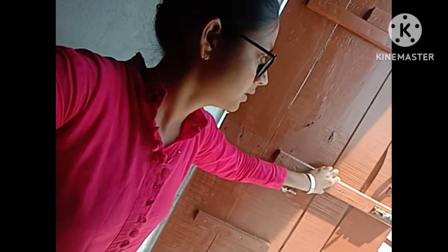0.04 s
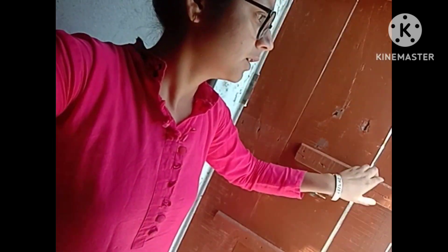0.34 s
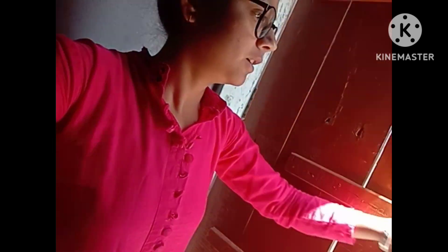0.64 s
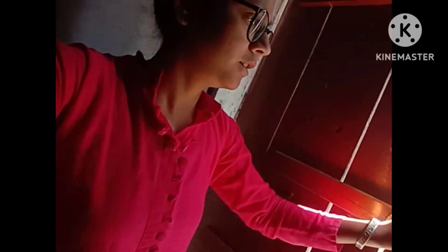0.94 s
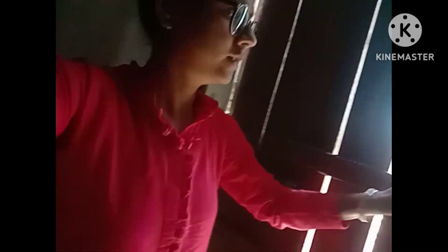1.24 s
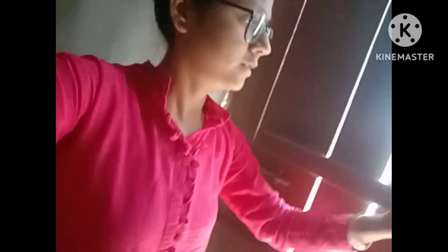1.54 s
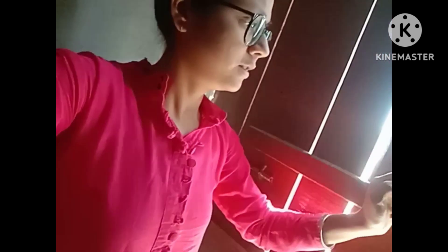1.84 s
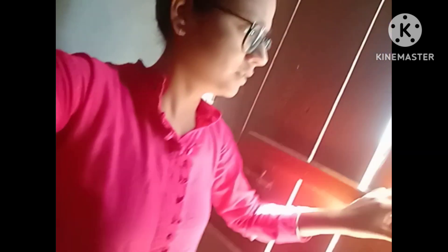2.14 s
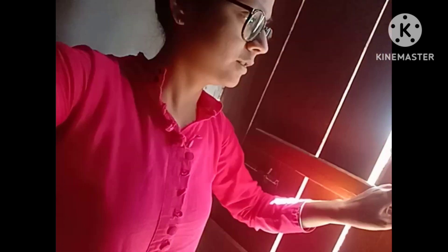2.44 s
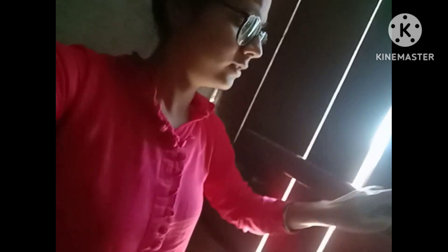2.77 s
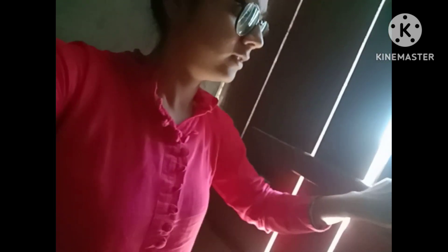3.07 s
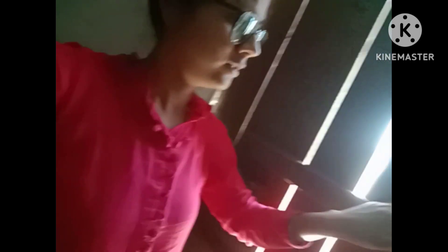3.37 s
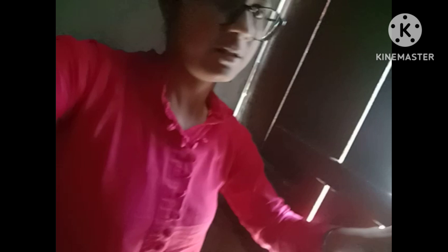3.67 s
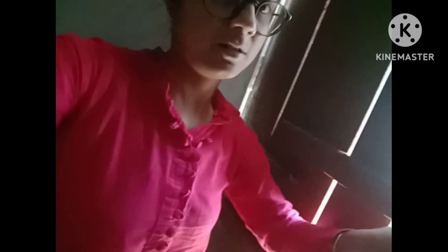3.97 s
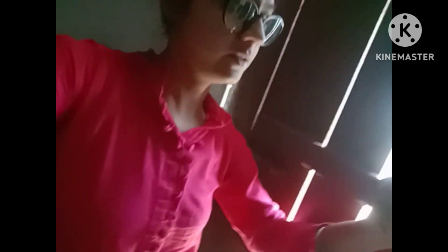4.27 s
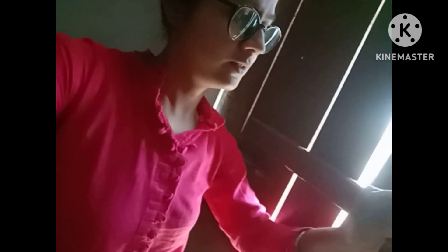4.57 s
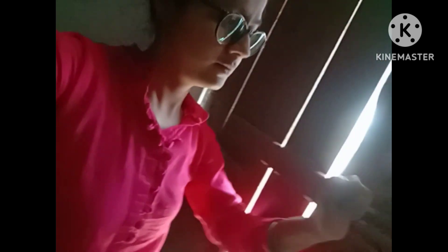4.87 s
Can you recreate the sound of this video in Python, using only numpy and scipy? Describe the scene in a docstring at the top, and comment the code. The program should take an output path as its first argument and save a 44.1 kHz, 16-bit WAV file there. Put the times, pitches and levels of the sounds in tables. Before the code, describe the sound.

A hand works a steel sliding bolt on a wooden plank door, close to the microphone in a small bare room. The bolt scrapes and clacks several times, then shoots home with a short metallic ring. The door thuds into its frame with a hollow boom. After faint ticks and hand brushing come a loud cluster of clacks and a second thud. A low rumble continues underneath.

```python
"""A steel sliding bolt is worked by hand on a wooden plank door, close up in a small bare room.
It scrapes in its guides, clacks against its stops and shoots home, setting its loop ringing.
Twice the door thuds into its frame and the leaf booms. Small ticks, thin squeaks and the brush
of a hand on wood fill the gaps. Underneath sits a bed of low room resonances, passing low tones,
restless air and a faint whine."""
import sys
import numpy as np
from scipy import signal
from scipy.fft import rfft, irfft, next_fast_len
from scipy.io import wavfile
from scipy.ndimage import uniform_filter1d, map_coordinates

SR = 44100
rng = np.random.default_rng(int(sys.argv[2]) if len(sys.argv) > 2 else 0)


def master_out(mix):
    """Clip the mix to full scale and print it as 16-bit PCM to the path in sys.argv[1]."""
    frames = np.transpose(np.atleast_2d(mix))
    ceiling = np.clip(frames, -1, 1)
    pcm = np.round(ceiling * 32767).astype(np.int16)
    wavfile.write(sys.argv[1], SR, pcm)


N = 225294

# bolt hits: t/s, level/dB before gain, struck spot f/Hz, wood/dB, brightness/dB, snap/dB
CLACKS = [(0.7408, -28, 1680, -29, -20.5, -13), (0.745, -24.5, 990, -18, -20.5, -2.5),
          (0.759, -32.5, 1000, -1, -9, -2.5), (1.16, -28.5, 4230, -38, -6.5, -5),
          (1.492, -20.5, 1350, -23, -30, -5), (1.505, -22.5, 1280, -16.5, -35.5, -4),
          (1.547, -25, 735, -7.5, -9, -10), (1.859, -39, 1400, -30, -10.5, -5.5),
          (2.392, -21.5, 1302, -4, -34, -16), (2.417, -14, 1910, -13, -7, 0.5),
          (4.048, -30, 1840, -12, -19.5, -2), (4.081, -22, 1590, -1, -13, -13),
          (4.1094, -10.5, 2330, -25, -11, -4), (4.135, -15.5, 1270, -7.5, -20, -7.5)]
# door contacts: t/s, level/dB before gain, treble corner f/Hz, panel ring/dB
THUDS = [(2.850, -16.5, 297, -0.5), (2.866, -12, 2240, -4.5), (2.882, -17, 512, 6.5), (2.926, -22, 1934, 3),
         (4.329, -15.5, 260, -14), (4.357, -17.5, 1098, -6.5), (4.364, -14, 150, -18)]
# bolt strokes: t/s, length/s, level/dB, rasp f/Hz, fizz/dB
SCRAPES = [(0.0, 0.011, -36, 6630, -3.5), (0.907, 0.046, -50, 4740, -9), (1.004, 0.057, -44.5, 4140, -2),
           (1.054, .1, -45.5, 3900, -21), (1.151, 0.049, -37, 3920, -2), (1.529, 0.048, -35.5, 1740, -5.5),
           (2.19, 0.024, -53.5, 1930, -7), (2.334, 0.079, -40.5, 1385, -10.5),
           (3.396, 0.015, -47.5, 2050, -15.5), (4.033, 0.064, -47.5, 2400, -5),
           (4.737, 0.058, -60, 3900, -14.5), (4.865, 0.063, -52, 2060, -12.5),
           (5.054, 0.06, -44.5, 2120, -8.5)]
# hand slides: fastest at t/s, length/s, level/dB
HAND_SLIDES = [(0.022, .2, -42), (3.682, 0.28, -41.5), (3.97, .25, -53.5), (4.91, 0.078, -47.5),
               (5.1, 0.13, -47)]
# swelling tones: t/s, length/s, f/Hz, level/dB
SQUEAKS = [(0.1, 0.31, 1645, -63), (0.41, 0.053, 1730, -56.5), (0.47, 0.28, 2266, -66),
           (0.5, 0.55, 3640, -83), (2.768, 0.061, 1242, -42), (4.92, 0.083, 566, -43.5)]
DRONES = [(0.0, 0.6, 170.4, -31), (.22, 0.33, 154.5, -31), (2.17, .5, 125.2, -33)]
# rumble swells and lulls: centre t/s, length/s, boom change/dB, upper change/dB
SURGES = [(.8, 0.67, -4, 12), (1.525, 0.083, -2.5, 9), (2.072, 0.14, -18.5, -0.5), (2.476, 0.27, -2, 12),
          (3.423, .2, -5, 1), (3.78, 0.16, 5, -6), (4.884, 0.15, -10.5, -5)]

# ringing modes: f/Hz, relative level/dB, t60/s before damping
SNAP_MODES = [(1269, -1.5, 0.087), (1740, 8.5, 0.008), (2140, 4.5, 0.0069), (2486, -8, 0.014),
              (3470, -12.5, 0.01), (4840, -16.5, 0.045), (5530, -20, 0.023), (6460, -16.5, 0.015)]  # the bolt's dry snap
BAR_MODES = [(1750, -12, 0.48), (1870, -2.5, 0.4), (2000, -0.5, 0.32), (2584, 7, 0.22), (2780, -4, 0.24),
             (2902, 3.5, 0.22)]  # the bolt's bar
LOOP_MODES = [(3540, -6.5, 0.26), (3440, 0, 0.4), (3700, -5.5, 0.76), (3860, -12.5, 0.45),
              (3950, 2.5, 0.41), (4060, -9, 0.19), (4420, -10, 0.5), (4400, -3.5, 0.57),
              (4750, -14.5, 0.94)]  # the loop it runs into
PANEL_MODES = [(78, -30, 0.82), (173.9, 11, 0.86), (307, -14.5, 1), (324.54, 5.5, 0.99), (432, -6.5, 0.14),
               (642, -3, 0.81), (687, -14.5, 0.33), (860, -24, 0.35), (884, -13, 0.93)]  # the door leaf
FLEX_MODES = [(74.9, 4, .3), (147, -13.5, 0.19), (183, -2.5, 0.48)]  # the whole leaf flexing

# tone curves: f/Hz, relative level/dB
BOLT_EQ = [(100, -27.5), (450, 1), (850, 3), (1250, -6), (1470, -3), (1900, -2), (2400, -7), (3100, -1),
           (3750, -1), (5000, -1), (6800, -15), (7900, -16), (10500, -7), (15500, -19.5)]
WOOD_EQ = [(35, -41.5), (58, -9.5), (76, 1), (105, -11), (170, -6), (210, -14.5), (310, -9.5), (470, -19),
           (640, -18), (950, -15.5), (1300, -21), (3000, -27.5), (4500, -35.5), (9000, -60.5)]
GRIT_EQ = [(200, -21.5), (750, -22.5), (1250, -3.5), (1800, -1), (2900, -4.5), (3900, -4), (5400, -4),
           (6600, -8.5), (7900, -20), (10500, -10.5), (13000, -24.5), (15500, -11.5)]
RUB_EQ = [(300, -10.5), (500, -8), (720, -2), (1000, -6), (1300, -9), (1700, -18), (3000, -34.5),
          (8000, -58.5)]
RUMBLE_EQ = [(15, -74.5), (25, -35), (37, -12), (51, -26.5), (64, -20), (85, -7.5), (103, -9), (156, -0.5),
             (184, -9.5), (204, -27), (244, -10), (275, -17.5), (328, -19), (352, -37), (420, -29),
             (550, -52.5), (920, -120)]
AIR_EQ = [(150, 6.5), (380, -4.5), (1000, 2.5), (1600, -7), (2400, -6.5), (3200, -16), (3800, -17),
          (5000, -21.5), (6800, -26.5), (7900, -34), (13000, -31.5), (15500, -29.5)]
SIDE_EQ = [(30, -4), (170, -11.5), (500, -20), (2000, -23), (8000, -29.5), (15000, -30)]
MIC_EQ = [(25, 3), (50, -23.5), (66, 1)]

# fader rides for the deepest rumble and the air: t/s, level/dB
DEEP_RIDE = [(0.15, -49.5), (.55, -38), (.87, -39), (1.6, -50.5), (1.95, -42), (2.2, -46), (2.65, -37.5),
             (3.75, -37.5), (4.8, -45.5)]
AIR_RIDE = [(0, -60), (.65, -50.5), (1.4, -58.5), (2.1, -56), (3.7, -53), (5.1, -55)]
# shared resonances that make the scene sound hollow: f/Hz, width/Hz, lift/dB
HOLLOWS = [(658, 97, 4.5), (1263.3, 218, 13), (1606, 52, 3.5), (2030, 410, 2.5), (3734, 360, 5.5),
           (5700, 370, 3), (6880, 960, 5)]
# room decay: f/Hz, t60/s
ROOM_DECAY = [(80, 0.77), (300, 0.99), (700, 0.7), (1300, 0.74), (2000, 0.62), (4600, 0.42), (5700, 0.41),
              (9000, 0.4), (15000, 0.13)]


def bolt_clacks(gain_db=21, crack_db=-3, spot_db=8, spot_width=0.41, fizz_db=-18.5):
    """Steel hits steel: a dry snap and crack, a faint ring, and the room's answer."""
    track = np.zeros(N)
    for s, db, spot_hz, wood_db, bright_db, snap_db in CLACKS:
        hardness = [(720, wood_db), (1180, 0), (2400, 0.014),
                    (4000, bright_db), (7000, bright_db), (9000, bright_db + fizz_db)]
        colour = body(lambda hz: tinted(BOLT_EQ, hz) + along(hardness, hz)
                      + hollow(hz, spot_hz, spot_width * spot_hz, spot_db))
        echo = unit_energy(signal.fftconvolve(colour, room(direct_db=-15))[:SR])
        force = contact(chatter_t60=0.02, attack_s=0.0003, push=0.9)
        crack = unit_energy(signal.fftconvolve(colour, force))
        # a dull blow leaves the snap's upper modes weak
        modes = [(hz, level + 0.5 * along(hardness, hz), t60) for hz, level, t60 in SNAP_MODES]
        snap = ring(modes, damping=0.34, scatter_db=3, attack_s=0.0019)
        bar = ring(BAR_MODES, damping=0.64, scatter_db=0, attack_s=0.0034, blur_per_s=90)
        bar_db = -21.5 + 0.35 * bright_db  # harder blows ring more
        add(track, s, amp(db + gain_db) * (echo + amp(snap_db) * snap + amp(bar_db) * bar))
        add(track, s, amp(db + gain_db + snap_db + crack_db) * crack)
    return track


def bolt_home(home_s=2.417, gain_db=-2.5, bar_db=-3, dry_db=-6, wet_db=-2):
    """Shot home, the bolt leaves its loop and its own bar ringing into the room."""
    track = np.zeros(N)
    loop = ring(LOOP_MODES, damping=0.95, scatter_db=2, attack_s=0.003, blur_per_s=600)
    bar = ring(BAR_MODES, damping=0.75, scatter_db=2, attack_s=0.003, blur_per_s=200)
    steel = loop + amp(bar_db) * bar
    echo = unit_energy(signal.fftconvolve(steel, room(direct_db=-3))[:SR])
    add(track, home_s, amp(gain_db) * (amp(dry_db) * steel + amp(wet_db) * echo))
    return track


def bolt_scrapes(catches_per_s=4000, spread_db=3, rasp_db=6, rasp_width=0.39, grind_hz=4150):
    """The sliding bolt catches on rough steel: dense tiny slips of uneven size."""
    track = np.zeros(N)
    t = np.arange(SR // 4) / SR
    for s, length, db, rasp_hz, fizz_db in SCRAPES:
        grind_db = 9 * np.log2(grind_hz / rasp_hz)  # a slower stroke rasps lower and grinds more
        stroke = np.clip(t / 0.0025, 0, 1) * np.clip((length - t) / 0.017 + 0.5, 0, 1)
        catches = rng.random(len(t)) < catches_per_s / SR
        slips = catches * rng.standard_normal(len(t)) * amp(spread_db * rng.standard_normal(len(t)))
        pressure = [(1800, grind_db), (4000, 0.021), (7000, 0), (9000, fizz_db)]
        colour = body(lambda hz: tinted(GRIT_EQ, hz) + along(pressure, hz)
                      + hollow(hz, rasp_hz, rasp_width * rasp_hz, rasp_db))
        rasp = signal.fftconvolve(slips * stroke, colour)
        scrape = unit_energy(signal.fftconvolve(rasp, room(direct_db=2.5)))
        add(track, s, amp(db) * np.sqrt(length * SR) * scrape)
    return track


def door_thuds(gain_db=24):
    """The leaf lands in several contacts; the softer one is, the duller it sounds."""
    track = np.zeros(N)
    for s, db, corner_hz, panel_db in THUDS:
        colour = body(lambda hz: tinted(WOOD_EQ, hz) - 10 * np.log10(1 + (hz / corner_hz) ** 4))
        blow = room(direct_db=-9.5)
        add(blow, 0, amp(-4) * contact(chatter_t60=0.021, attack_s=0.001, push=0.44))
        knock = unit_energy(signal.fftconvolve(colour, blow)[:SR])
        panel = ring(PANEL_MODES, damping=1.15, scatter_db=-1, attack_s=0.0057)
        flex = ring(FLEX_MODES, damping=0.49, scatter_db=-1.5, attack_s=0.0052)
        flex_db = 1 - 4 * np.log2(corner_hz / 298)  # softer blows flex the leaf more
        add(track, s, amp(db + gain_db) * (knock + amp(panel_db) * panel + amp(flex_db) * flex))
    return track


def bolt_ticks(first_s=2.7, last_s=5.11, typical_gap_s=1 / 14, db=-39.5, spread_db=7.5):
    """Under the hand the loose bolt ticks faintly, at a different spot each time."""
    track = np.zeros(N)
    chance = rng.standard_normal((64, 3))
    times = first_s + typical_gap_s * np.cumsum(np.exp(0.5 * chance[:, 0]))
    for s, (_, strength, place) in zip(times[times < last_s], chance):
        spot_hz = 3000 * 2 ** (0.83 * place)
        colour = body(lambda hz: along(GRIT_EQ, hz) + hollow(hz, spot_hz, spot_hz / 2, 9), size=1024)
        tick = unit_energy(signal.fftconvolve(colour, room(direct_db=-15.5)))
        add(track, s, amp(db + spread_db * np.tanh(strength)) * tick)
    return track


def squeaks():
    """For a moment the rubbing of door or bolt locks onto one unsteady pitch."""
    return tones(SQUEAKS, drift_per_s=45)


def hand_rub(edge_fall_db=7):
    """A dull brushing that rises and falls with each slide of the hand along the wood."""
    t = np.arange(N) / SR
    speed = sum(amp(db - edge_fall_db * np.abs(2 * (t - s) / length)) for s, length, db in HAND_SLIDES)
    return speed * noise(lambda hz: tinted(RUB_EQ, hz))


def rumble(boom_db=-38, upper_db=-53):
    """The room's low resonances: the deepest band drifts, the two above it swell and sink."""
    t = np.arange(N) / SR
    s, length, boom_change_db, upper_change_db = np.transpose(SURGES)
    swells = 0.5 ** ((2 * (t[:, None] - s) / length) ** 2)
    deep = rumble_band(low_hz=20, high_hz=79, db=ride(DEEP_RIDE))
    boom = rumble_band(low_hz=115, high_hz=197, db=boom_db + swells @ boom_change_db)
    upper = rumble_band(low_hz=189, high_hz=398, db=upper_db + swells @ upper_change_db)
    return deep + boom + upper


def rumble_band(low_hz, high_hz, db, steadiness=0.69, waver_db=2):
    """One group of low room resonances, evened out and then set wavering about its level."""
    band = noise(lambda hz: along(RUMBLE_EQ, hz) + hollow(hz, centre_hz=76.2, width_hz=22, lift_db=17)
                 - 10 * np.log10(1 + (low_hz / (hz + 1)) ** 16 + (hz / high_hz) ** 16))
    envelope = np.sqrt(np.abs(uniform_filter1d(band ** 2, size=4096)) + 1e-6)
    return amp(db + waver_db * wobble(per_s=9)) * unit_rms(band / envelope ** steadiness)


def drone():
    """Low, nearly steady tones rise out of the rumble and sink back."""
    return tones(DRONES, drift_per_s=0.7)


def air(waver_db=1.65, patchy_db=3.44):
    """Faint, hollow room tone, restless in small patches of time and pitch."""
    steady = noise(lambda hz: tinted(AIR_EQ, hz) + hollow(hz, centre_hz=1246, width_hz=120, lift_db=9))
    spectra = signal.stft(steady, nperseg=512)[2]
    patches = uniform_filter1d(rng.standard_normal(spectra.shape), size=4, axis=0)
    patches = uniform_filter1d(patches, size=14, axis=1)
    hiss = signal.istft(spectra * amp(patchy_db * unit_rms(patches)), nperseg=512)[1][:N]
    return amp(ride(AIR_RIDE) + waver_db * wobble(per_s=14)) * unit_rms(hiss)


def whine(hz=1256, db=-58, drift_per_s=110, waver_db=1.5):
    """A faint, fuzzy tone hangs in the room, rising and falling with the air."""
    air_db = ride(AIR_RIDE)
    phase = 2 * np.pi * hz * np.arange(N) / SR + wander(N, drift_per_s)
    return amp(db + air_db - air_db.mean() + waver_db * wobble(per_s=18)) * np.sin(phase)


def room(direct_db, build_s=0.0016):
    """The direct sound, then a fresh wall echo whose treble dies first; energy 1."""
    hz, t, spectra = signal.stft(rng.standard_normal(SR), SR, nperseg=256)
    decay = amp(-60 * t / along(ROOM_DECAY, hz)[:, None])
    tail = signal.istft(spectra * decay, SR, nperseg=256)[1][:SR]
    tail *= 1 - np.exp(-np.arange(SR) / SR / build_s)
    response = 0.81 * unit_energy(tail)
    response[0] += amp(direct_db)
    return unit_energy(response)


def contact(chatter_t60, attack_s, push):
    """A sharp push and a few milliseconds of chatter as two surfaces meet; energy 1."""
    t = np.arange(SR // 16) / SR
    chatter = rng.standard_normal(len(t)) * amp(-60 * t / chatter_t60)
    force = unit_energy(chatter * (1 - np.exp(-t / attack_s)))
    force[0] += push
    return unit_energy(force)


def ring(modes, damping, scatter_db, attack_s, blur_per_s=0):
    """Damped modes at scattered strengths, energy 1; rattling in the mount blurs their phase."""
    t = np.arange(SR) / SR
    hz, db, t60 = np.transpose(modes)[:, :, None]
    level_db = db + scatter_db * rng.standard_normal(db.shape) - 60 * t * damping / t60
    drift = wander(level_db.shape, blur_per_s) if blur_per_s else 0
    partials = amp(level_db) * np.sin(2 * np.pi * hz * t + drift)
    return unit_energy(partials.sum(axis=0) * (1 - np.exp(-t / attack_s)))


def tones(rows, drift_per_s):
    """Tones that swell and fade while their phase wanders."""
    track = np.zeros(N)
    t = np.arange(SR) / SR
    for s, length, hz, db in rows:
        drift = wander(SR, drift_per_s)
        swell = np.sqrt(np.abs(np.sin(np.pi * np.clip(t / length, 0, 1))))
        add(track, s, amp(db) * swell * np.sin(2 * np.pi * hz * t + drift))
    return track


def body(colour_db, size=8192):
    """A tight, minimum-phase click with the given colour; energy 1."""
    cepstrum = irfft(np.log(amp(colour_db(np.fft.rfftfreq(size, 1 / SR)))))
    cepstrum[1:size // 2] *= 2
    cepstrum[size // 2 + 1:] = 0
    return unit_energy(irfft(np.exp(rfft(cepstrum))))


def noise(colour_db):
    """Steady noise with the given colour; rms 1."""
    return unit_rms(irfft(rfft(rng.standard_normal(N)) * amp(colour_db(np.fft.rfftfreq(N, 1 / SR))), N))


def tinted(points, hz, ripple_db=2.5, spacing_hz=70):
    """A tone curve in dB, plus the shared resonances and the fine ripple of near walls."""
    ripple = map_coordinates(rng.standard_normal(2048), [hz / spacing_hz], mode="mirror")
    return along(points, hz) + sum(hollow(hz, *row) for row in HOLLOWS) + ripple_db * ripple


def hollow(hz, centre_hz, width_hz, lift_db):
    """The bell-shaped boost of one resonance, in dB."""
    return lift_db / (1 + (2 * (hz - centre_hz) / width_hz) ** 2)


def along(points, hz):
    """Read a curve of (f/Hz, value) points on a log frequency axis."""
    point_hz, values = np.transpose(points)
    return np.interp(np.log(hz + 1), np.log(point_hz + 1), values)


def ride(points):
    """A fader ride, in dB at every sample."""
    return np.interp(np.arange(N) / SR, *np.transpose(points))


def wobble(per_s):
    """A smooth random curve with so many knots a second."""
    return map_coordinates(rng.standard_normal(512), [np.arange(N) * per_s / SR], mode="mirror")


def wander(shape, per_s):
    """A smoothly wandering phase, in radians."""
    steps = rng.standard_normal(shape) * np.sqrt(per_s / SR)
    return np.cumsum(uniform_filter1d(uniform_filter1d(steps, size=96), size=64), axis=-1)


def add(track, s, sound):
    """Mix a sound into the track at time s."""
    start = int(np.clip(round(s * SR), 0, N - 1))
    track[start:start + len(sound)] += sound[:N - start]


def amp(db):
    return 10 ** (np.asarray(db) / 20)


def unit_rms(x):
    return x / np.sqrt(np.mean(x ** 2) + 1e-20)


def unit_energy(x):
    return x / (np.linalg.norm(x) + 1e-12)


def scene():
    """Hits, handling and room bed sit in the centre; a trace of hiss adds width."""
    hits = bolt_clacks() + bolt_home() + door_thuds()
    handling = bolt_scrapes() + bolt_ticks() + squeaks() + hand_rub()
    bed = rumble() + drone() + air() + whine()
    mid = hits + handling + bed
    side = amp(-78) * noise(lambda hz: along(SIDE_EQ, hz))
    return np.array([mid + side, mid - side])


def record(dry, top_hz=15600):
    """The microphone scoops the deep bass around 50 Hz; nothing is kept above top_hz."""
    size = next_fast_len(N + SR // 2)
    hz = np.fft.rfftfreq(size, 1 / SR)
    response = amp(along(MIC_EQ, hz)) * (hz < top_hz)
    return irfft(rfft(dry, size) * response, size)[:, :N]


dry = scene()
out = record(dry)
master_out(out)
```